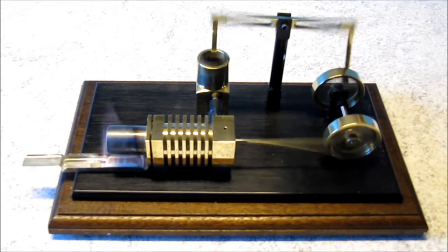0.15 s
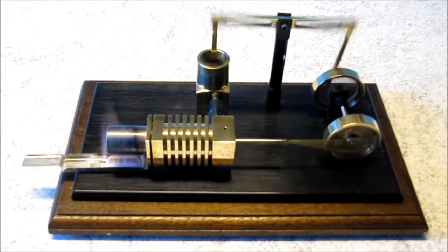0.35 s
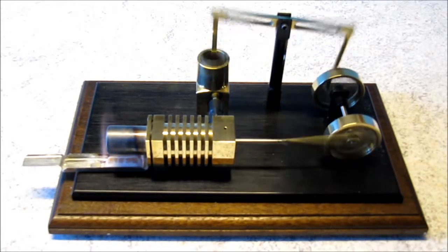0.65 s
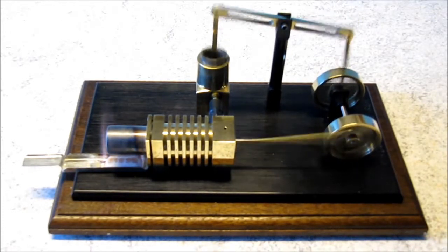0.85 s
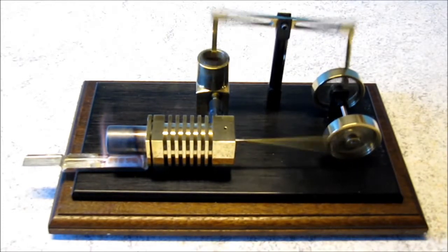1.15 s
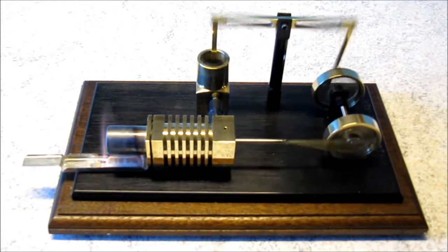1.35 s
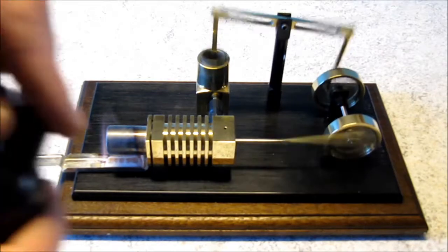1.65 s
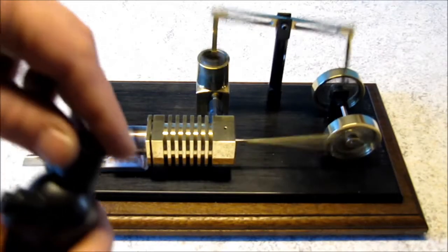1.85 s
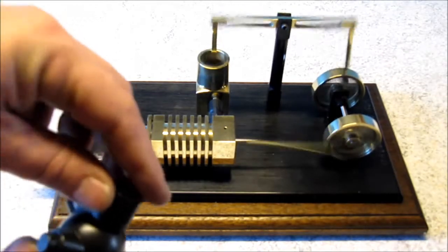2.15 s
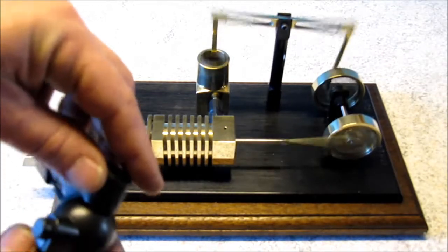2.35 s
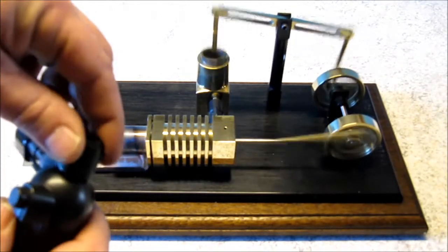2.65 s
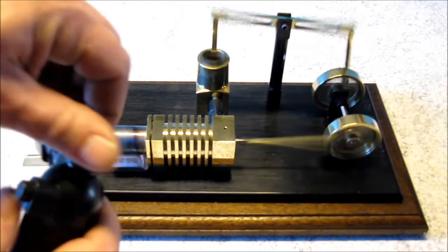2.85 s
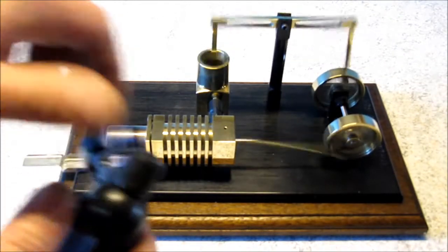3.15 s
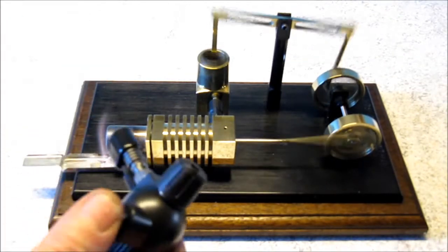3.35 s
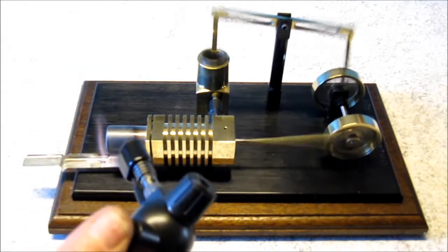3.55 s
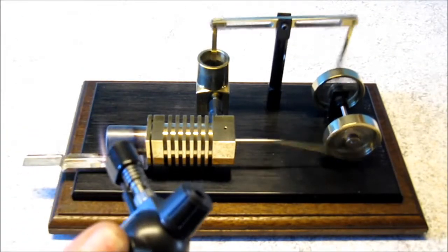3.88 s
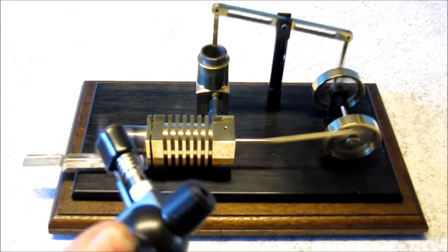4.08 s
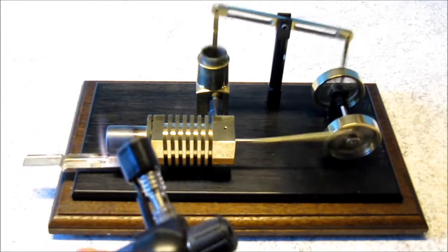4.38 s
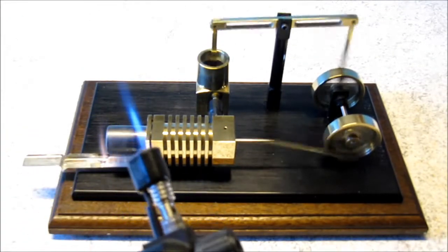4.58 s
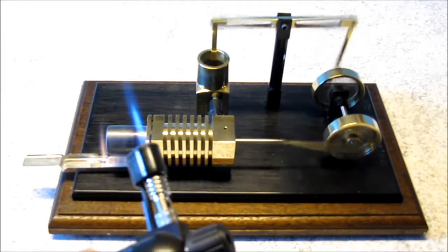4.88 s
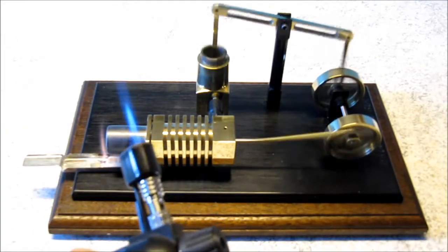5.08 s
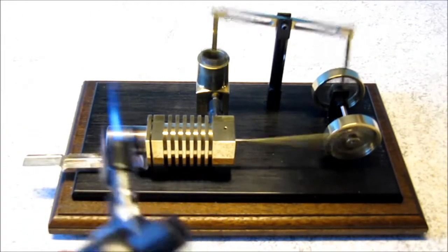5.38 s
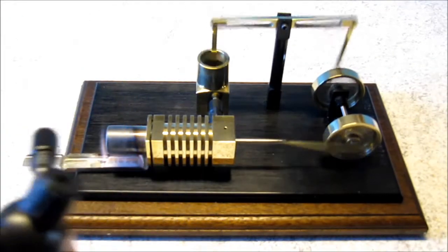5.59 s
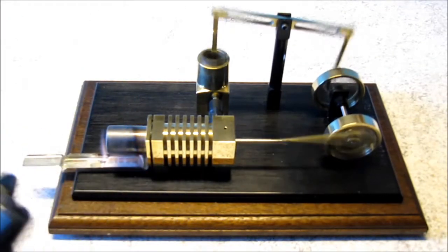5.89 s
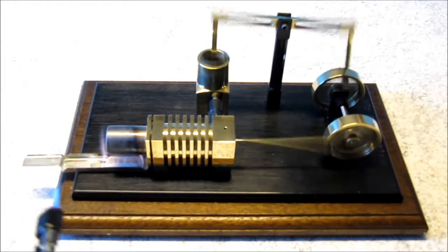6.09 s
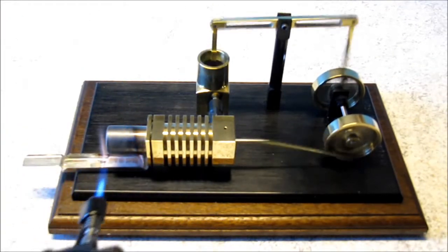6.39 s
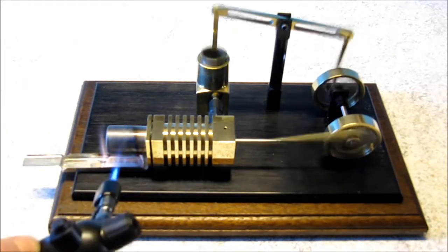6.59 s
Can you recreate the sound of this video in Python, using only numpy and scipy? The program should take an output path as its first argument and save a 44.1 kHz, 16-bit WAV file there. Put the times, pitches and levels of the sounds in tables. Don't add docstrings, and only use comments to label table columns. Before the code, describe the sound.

Rapid bright clacking of small loose metal joints, steady and galloping, over a faint low hum and soft hiss. After several seconds comes a hard click of a gas lighter with a short whoosh, the clatter momentarily pushed down by the microphone's automatic gain, then returning over a quiet flame roar. Close microphone, small indoor room, slight reverberation.

```python
import sys
import numpy as np
from scipy import signal
from scipy.fft import rfft, irfft
from scipy.io import wavfile
from scipy.ndimage import uniform_filter1d

SR = 44100
rng = np.random.default_rng(int(sys.argv[2]) if len(sys.argv) > 2 else 0)


def file_out(sig):
    cols = np.atleast_2d(sig).T
    lim = np.clip(cols, -1, 1)
    pcm = np.round(lim * 32767).astype(np.int16)
    wavfile.write(sys.argv[1], SR, pcm)


def linear_from_db(decibels):
    return 10 ** (np.asarray(decibels, float) / 20)


N = 296786

# blow in dB, its scatter in dB, brightness in dB, its scatter in dB.
BEAM_PIN = (-25.5, 0.5, 4, 3.5)
PISTON_DOWN = (-19, 0.1, 1.62, 1.5)
ROD_PIN = (-22, 0, 0.5, 1.2)
PISTON_UP = (-18.5, 1, -3, 1.5)
# pitch in Hz, level in dB, time to fade by 60 dB in seconds.
BEAM_MODES = [(757, 3.5, 0.045), (1310, -26, 0.12), (1750, -50.5, 0.12), (2590, 4, 0.02),
              (2980, 4.5, 0.056), (4100, -3, 0.031), (4600, -17, 0.054), (5430, -2, 0.051),
              (6520, 9, 0.018), (7150, -17.5, 0.033), (7250, -20, 0.027), (8200, 3.5, 0.022),
              (9160, -6.5, 0.015), (9360, 5, 0.013), (10530, 0.5, 0.022), (10100, -33, 0.052),
              (10820, -13, 0.084), (11500, 2, 0.035), (13000, -7, 0.037), (14000, -5, 0.014),
              (13100, -15, 0.019), (14976, -38, 0.016)]
DOWN_MODES = [(671, -14.5, 0.62), (1064, -13.5, 0.6), (1778, -11.5, 0.1), (2530, 8, 0.028),
              (2910, 5, 0.051), (3220, 4.5, 0.014), (3620, 1.5, 0.044), (4160, 6.5, 0.016),
              (4695, -1.5, 0.024), (5660, 11.5, 0.0092), (5986, 7, 0.0083), (6460, 0.5, 0.035),
              (7350, 1, 0.018), (7650, 5, 0.022), (7700, -2, 0.012), (8300, 0, 0.044), (8850, -2.5, 0.018),
              (9840, -6, 0.043), (9900, 4, 0.041), (10540, 2.5, 0.032), (12000, -21, 0.015),
              (11200, -9, 0.025)]
ROD_MODES = [(1056, 4.5, 0.04), (1635, -2, 0.056), (2377, 0.5, 0.024), (3190, -13.5, 0.18),
             (3945, -8, 0.044), (4600, -21, 0.11), (5050, -33.5, 0.21), (5490, 0.5, 0.0024),
             (6360, 1.5, 0.022), (6500, -26, 0.077), (7360, -17, 0.027), (7400, -1, 0.089),
             (7400, -1, 0.027), (8365, -25, 0.04), (8786, 5, 0.013), (9410, -20, 0.03), (9580, 9.5, 0.0061),
             (10400, -17, 0.12), (10600, -10, 0.016), (11420, -9.5, 0.013), (14168, -44, 0.12),
             (14804, -58, 0.12)]
UP_MODES = [(970, -36, 0.05), (1217, -17, 0.066), (1610, -29, 0.049), (2070, -37, 0.21),
            (2369, -9.5, 0.073), (2996, -6, 0.076), (3275, 6, 0.017), (4010, 6.5, 0.0083), (4460, 2, 0.027),
            (5560, 8.5, 0.011), (6306, 9.5, 0.012), (7100, -20, 0.036), (7710, 9.5, 0.01), (8100, 4, 0.014),
            (9000, -10, 0.074), (9400, -47, 0.031), (9900, -4, 0.012), (11000, -34, 0.017),
            (12600, -24, 0.09), (12736, -35, 0.046), (14351, -48, 0.12), (14761, -51, 0.037)]
# delay in seconds, level in dB, its scatter in dB.
DOWN_LEAD = (-0.0024, -23, 1.3)
ROD_LEAD = (-.010, -20, 3)
ROD_BOUNCE = (.007, -5, 0.7)
# pitch in Hz, down stroke in dB, up stroke in dB, 60 dB fade in seconds.
BASE_MODES = [(217, -28, -24, 0.14), (373.8, -24.5, -33, 0.17), (510.6, -23, -36.5, 0.15),
              (702, -11.5, -35.5, 0.08), (762, -12, -14.5, 0.12), (883, -5.5, -6.5, 0.11),
              (894, -2, -5.5, 0.047), (949, -15.5, -22.5, 0.14), (1617, -16, -15, 0.048),
              (2604, -27, -6.5, 0.042), (12290, -40, -31, 0.16), (14400, -42, -45, 0.12)]
# time in seconds, speed in turns per second.
CRANK_SPEED = [(0, 6.851), (.5, 7.071), (.55, 6.854), (1.05, 7.006), (1.06, 7.095), (2.51, 7.039),
               (2.66, 6.889), (3.05, 7.17), (3.07, 6.935), (3.49, 7.201), (4.52, 6.922), (4.58, 7.195),
               (5.25, 7.112), (5.5, 7.06), (5.65, 7.337), (6.42, 7.19), (6.73, 7.278)]
KNOCK_ANGLES = [.0437, .1733, .5323, .5989]
GRAZED_TURNS = [1, 5, 7, 15, 19, 24, 26, 28, 30, 31, 34, 40, 42, 44, 45, 46]
SLAMMED_TURNS = [2, 12, 16, 17, 21, 23, 37]
# pitch in Hz, width in Hz, level in dB.
SPARK_MODES = [(1900, 330, 4), (3550, 470, 8), (6580, 350, 4), (7700, 170, -16), (7400, 150, -7),
               (9500, 370, 8), (10800, 160, -5), (11600, 470, -25), (13100, 340, -21), (14900, 780, -27)]
# frequency in Hz, level in dB per Hz.
HISS_COLOUR = [(18, -55), (30, -16), (211, -2), (590, -3.5), (877, 4.5), (1370, 1.5), (1610, -8),
               (1930, 3.5), (2450, 0.5), (5700, -7.5), (9910, -10.5), (14700, -77), (16400, -58)]
JET_COLOUR = [(200, -24), (600, -18), (2000, -11), (5000, -8), (7700, -2), (10000, -6), (13000, -17),
              (16400, -38)]
ROAR_COLOUR = [(30, 0), (120, 5), (400, 10.5), (1200, 12.5), (3000, 7), (8000, -16), (13500, -15),
               (16400, -25)]
# time in seconds, level in dB.
HUM_LEVEL = [
    (0, -64),
    (.2, -55.5),
    (1.55, -58),
    (2.5, -54),
    (4.4, -52.5),
    (4.48, -66),
    (6.04, -55),
    (6.35, -64),
    (6.73, -53),
]
# frequency in Hz, 60 dB fade in seconds.
ROOM_FADE = [(300, 0.9), (1500, 0.2), (5000, 0.12), (12000, 0.44)]
# frequency in Hz, gain in dB.
MICROPHONE = [(20, -7), (70, 0), (1150, -1.5), (1400, -1.5), (1650, 5), (1930, -8), (2300, 0.5),
              (4300, 0.5), (4900, 1), (5500, 0.5), (11500, 0), (13000, -1), (15200, -5), (16400, -40)]

SPARK_S = 4.4552


def evened(x):
    return x / np.sqrt(np.mean(x ** 2) + 1e-20)


def read(points, hz):
    f, value = np.transpose(points)
    return np.interp(np.log(hz + 1), np.log(f + 1), value)


def level(rows):
    s, db = np.transpose(rows)
    return linear_from_db(np.interp(np.arange(N) / SR, s, db, left=-120))


def add(mix, s, sound):
    part = mix[max(round(s * SR), 0):][:len(sound)]
    part += sound[:len(part)]


def noise(spectrum, patchy_db):
    frames, hz = N // 128 + 5, np.fft.rfftfreq(512, 1 / SR)
    a, b, patches = rng.standard_normal((frames, 257, 3)).T
    patches = uniform_filter1d(patches, 6, 0)
    patches = evened(uniform_filter1d(patches, 12, 1))
    z = (a + 1j * b) * linear_from_db(read(spectrum, hz)[:, None] + patchy_db * patches)
    return evened(signal.istft(z, nperseg=512, noverlap=384)[1][:N])


def hum():
    hum_hz, width_hz = 101, 10
    turn = np.exp(2j * np.pi * hum_hz * np.arange(N) / SR)
    r = np.exp(-np.pi * width_hz / SR)
    slow = signal.lfilter([1], [1, -r], rng.standard_normal(N) + 1j * rng.standard_normal(N))
    steadied = slow / (abs(slow) + .5 * abs(slow).mean())
    return level(HUM_LEVEL) * evened((turn * steadied).real)


def room(x):
    hz, t, z = signal.stft(rng.standard_normal(SR // 2), SR, nperseg=128)
    tail = signal.istft(z * linear_from_db(-60 * t / read(ROOM_FADE, hz)[:, None]), SR, nperseg=128)[1]
    tail = tail * np.clip(np.arange(len(tail)) / SR / 0.0013, 0, 1)
    room_db = -14
    return linear_from_db(room_db) * signal.fftconvolve(x, tail / np.linalg.norm(tail))[:N]


def flame():
    flare_db, jet_db, roar_db = -16, -48, -40.5
    since = np.arange(N) / SR - SPARK_S - .002
    fall_db = flare_db - 130 * since - 700 * since ** 2
    jet = (since > 0) * linear_from_db(np.clip(fall_db, jet_db, flare_db))
    lit = level([(4.46, roar_db), (5.3, roar_db + 0.5), (6.2, roar_db - 7), (6.73, roar_db)])
    return jet * noise(JET_COLOUR, patchy_db=0.7) + lit * noise(ROAR_COLOUR, patchy_db=-1.0)


def spark():
    spark_db = -4.5
    t, out = np.arange(2500) / SR, np.zeros(N)
    snap = np.zeros(len(t))
    for k, (hz, width_hz, db) in enumerate(SPARK_MODES):
        fade = np.exp(-np.pi * width_hz * t)
        snap += (-1) ** k * linear_from_db(db) * fade * np.sin(2 * np.pi * hz * t)
    crackle = rng.standard_normal(70) * np.exp(-t[:70] / .0007)
    snap = signal.fftconvolve(snap, crackle)
    snap = linear_from_db(spark_db) * snap / np.sqrt(np.mean(snap[:80] ** 2))
    for delay_s, db in ((0, 0), (.0034, -8), (.007, -15)):
        add(out, SPARK_S + delay_s, linear_from_db(db) * snap)
    return out


def rattle(rows):
    rattle_db, fade_s = -11, 0.16
    power, t = np.zeros(N), np.arange(12000) / SR
    for s, blow_db, _ in rows:
        fade = linear_from_db(2 * (blow_db + rattle_db - 60 * t / fade_s))
        add(power, s, fade * (1 - np.exp(-t / 0.0051)))
    return np.sqrt(power) * noise(HISS_COLOUR, patchy_db=0.5)


def base(down, up):
    t, out = np.arange(7000) / SR, np.zeros(N)
    hz, down_db, up_db, t60 = np.transpose(BASE_MODES)[:, :, None]
    sense = (-1.) ** np.arange(len(BASE_MODES))[:, None]
    for rows, db, swell_s in ((down, down_db, .002), (up, up_db, .006)):
        swell = 1 - np.exp(-t / swell_s)
        chance = rng.standard_normal((len(rows), 2, len(BASE_MODES), 1))
        for (s, blow_db, _), z in zip(rows, chance):
            size = sense * linear_from_db(blow_db + 4.5 + db + z[0] - 60 * t / t60)
            waves = size * np.sin(2 * np.pi * hz * t + 0.33 * z[1])
            add(out, s, swell * waves.sum(0))
    return out


def crank():
    play_s = .0003
    graze_db, graze_dull_db, slam_db = -7, -0.5, 3
    t = np.arange(N) / SR
    turns = np.cumsum(np.interp(t, *np.transpose(CRANK_SPEED))) / SR
    turn = np.arange(int(turns[-1] - max(KNOCK_ANGLES)) + 1)
    joints = (BEAM_PIN, PISTON_DOWN, ROD_PIN, PISTON_UP)
    chance = rng.standard_normal((len(turn), len(joints), 3)).T
    out = []
    for k, (blow_db, blow_spread_db, bright_db, bright_spread_db) in enumerate(joints):
        grazed = np.isin(turn, GRAZED_TURNS) * (k == 0)
        slammed = np.isin(turn, SLAMMED_TURNS) * (k == 0)
        s = np.interp(turn + KNOCK_ANGLES[k], turns, t) + play_s * chance[0, k]
        blow = blow_db + blow_spread_db * chance[1, k] + graze_db * grazed + slam_db * slammed
        bright = bright_db + bright_spread_db * chance[2, k] + graze_dull_db * grazed
        out.append(np.transpose([s, blow, bright]))
    return out


def knocks(rows, modes, rise_s, chatter_s, crack_db, crack_s, extras=()):
    hz, db, t60 = np.transpose(modes)[:, :, None]
    t, out = np.arange(2200) / SR, np.zeros(N)
    treble = np.clip(np.log2(hz / 5000), -.5, .5)
    t60 = np.minimum(t60, .025 * (7500 / hz) ** 2)
    sense = (-1.) ** np.arange(len(modes))[:, None]
    short = t[:700]
    rise = 1 - np.exp(-short / rise_s)
    habit, habit_grit = rng.standard_normal((2, 700))
    chatter = rise * np.exp(-short / chatter_s)
    push = chatter * habit ** 3 * np.exp(-2j * np.pi * hz * short)
    reach = abs(push.sum(1, keepdims=True))
    chance = rng.standard_normal((len(rows), 3, len(modes), 1))
    grits = rng.standard_normal((len(rows), 2, 700))
    for (s, blow_db, bright_db), z, grit in zip(rows, chance, grits):
        size = linear_from_db(db + 2.12 * z[0] + 2 * bright_db * treble - 60 * t / t60)
        waves = sense * size * np.sin(2 * np.pi * hz * (1 + 0.0042 * z[1]) * t)
        ringing = (waves / (reach + 0.45 * reach.mean())).sum(0)
        tone = signal.fftconvolve(ringing, chatter * (habit ** 3 + 0.19 * grit[0] ** 3))
        blurred = (waves * (hz > 2200)).sum(0) * (1 - np.exp(-t / 0.000067)) * np.exp(-t / 0.00055)
        scrape = rise * np.exp(-short / crack_s) * (0.5 * habit_grit + grit[1])
        crack = signal.fftconvolve(blurred, scrape)
        blow = tone / np.linalg.norm(tone[:330]) + linear_from_db(crack_db) * crack / np.linalg.norm(crack[:330])
        blow /= np.sqrt(np.mean(blow[:330] ** 2))
        add(out, s, linear_from_db(blow_db) * blow)
        for k, (delay_s, extra_db, spread_db) in enumerate(extras):
            add(out, s + delay_s, linear_from_db(blow_db + extra_db + spread_db * z[2, k]) * blow)
    return out


def scene():
    beam, down, rod, up = crank()
    engine = knocks(beam, BEAM_MODES, rise_s=.0001, chatter_s=.0006, crack_db=-8, crack_s=.002)
    engine += knocks(down, DOWN_MODES, rise_s=.0007, chatter_s=.0014, crack_db=-1.5, crack_s=.004,
                     extras=[DOWN_LEAD])
    engine += knocks(rod, ROD_MODES, rise_s=.0001, chatter_s=0.00048, crack_db=-2.5, crack_s=0.0064,
                     extras=[ROD_LEAD, ROD_BOUNCE])
    engine += knocks(up, UP_MODES, rise_s=.0015, chatter_s=.0022, crack_db=-2, crack_s=.005)
    no_bass = signal.butter(3, 850, "highpass", fs=SR, output="sos")
    near = signal.sosfilt(no_bass, engine + spark())
    hiss = linear_from_db(-41.5) * noise(HISS_COLOUR, patchy_db=2.5)
    air = rattle(np.vstack([beam, down, rod, up])) + hiss + hum() + flame()
    return (near + room(near) + base(down, up) + air)[None]


def low_pass(x):
    return signal.sosfilt(signal.butter(12, 16510, fs=SR, output="sos"), x)


def record(dry):
    duck_db, drop_s, recover_s = -13, 0.011, 0.31
    padded = N + 4096
    hz = np.fft.rfftfreq(padded, 1 / SR)
    heard = irfft(rfft(dry, padded) * linear_from_db(read(MICROPHONE, hz)), padded)[:, :N]
    since = np.maximum(np.arange(N) / SR - SPARK_S, 0)
    gain_db = duck_db * (1 - np.exp(-since / drop_s)) * np.exp(-since / recover_s)
    mix = np.clip(heard * linear_from_db(gain_db), -.98, .98)
    return low_pass(mix)


dry = scene()
out = record(dry)
file_out(out)
```